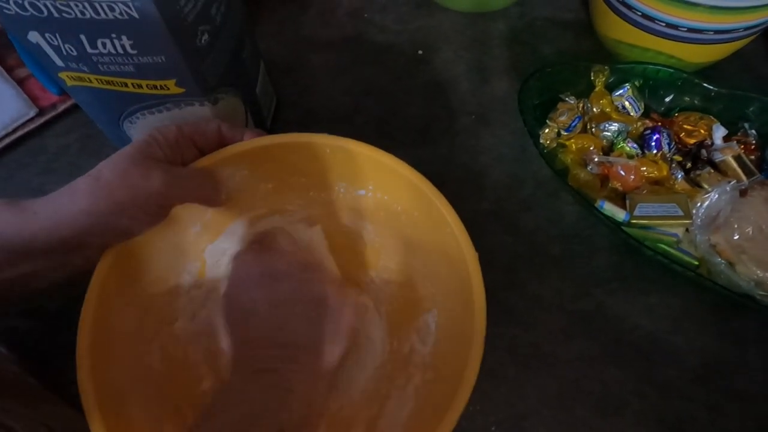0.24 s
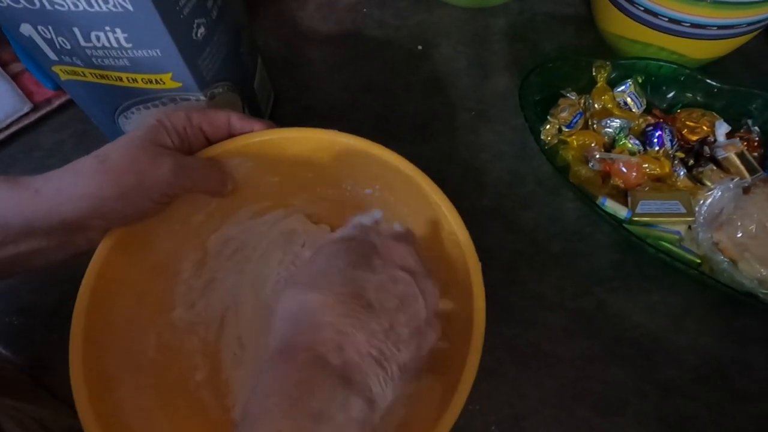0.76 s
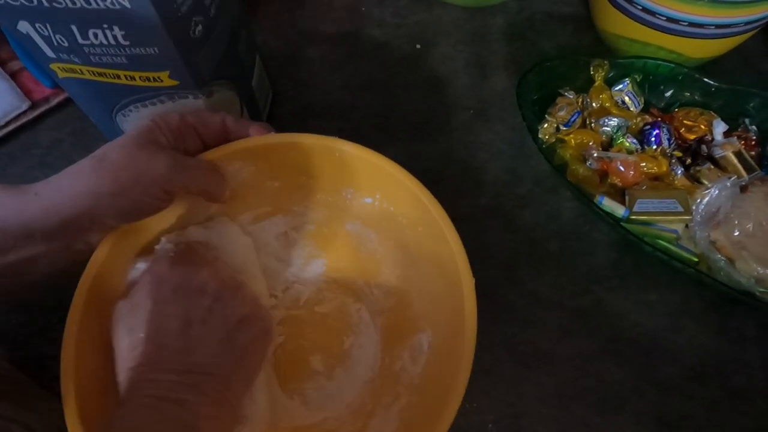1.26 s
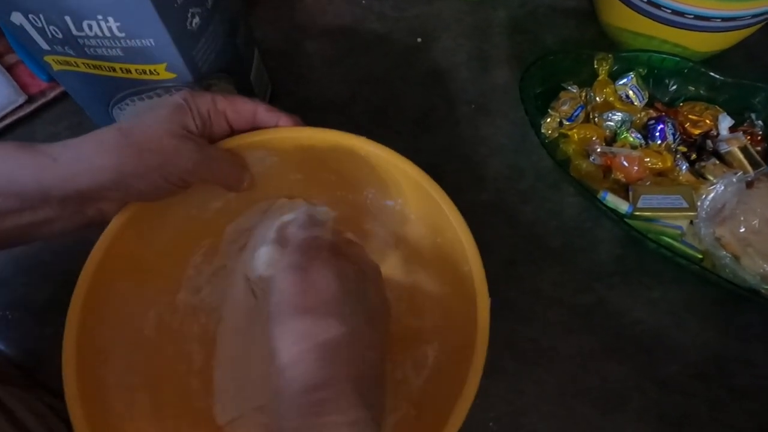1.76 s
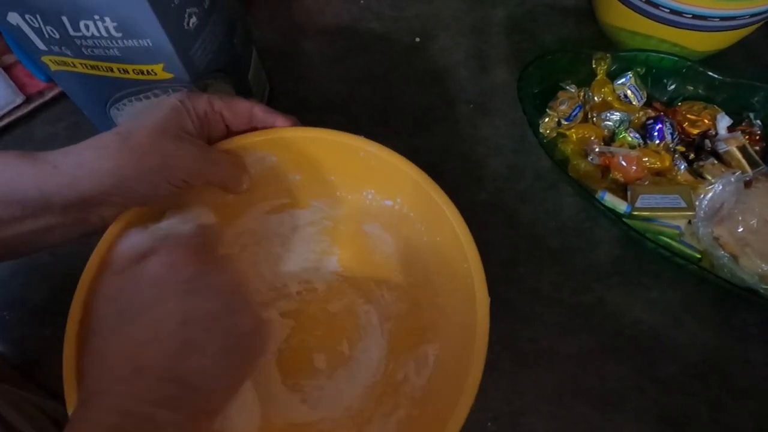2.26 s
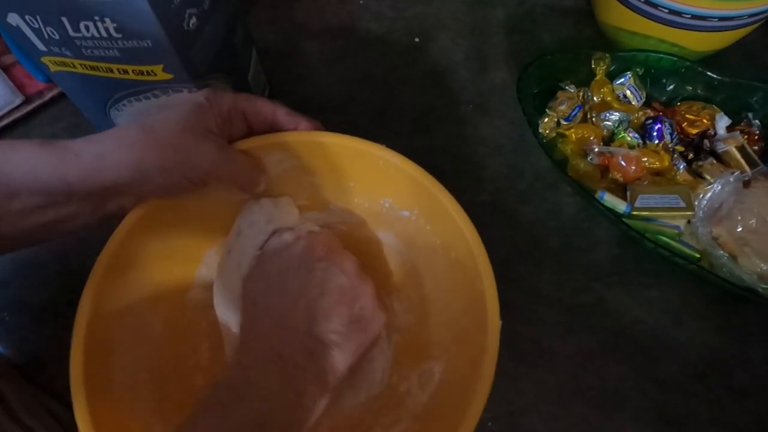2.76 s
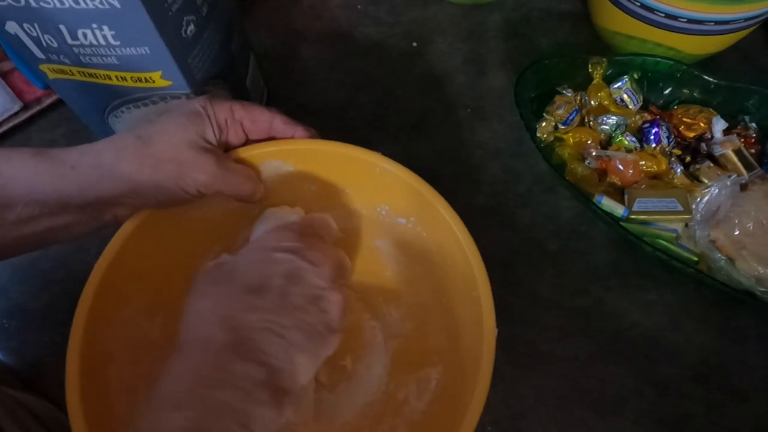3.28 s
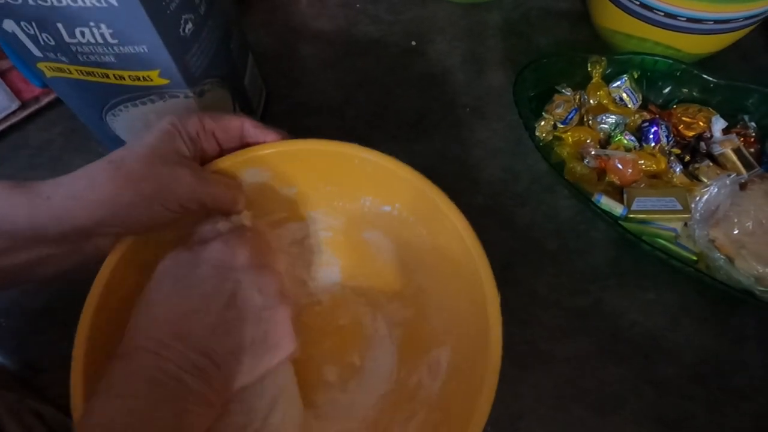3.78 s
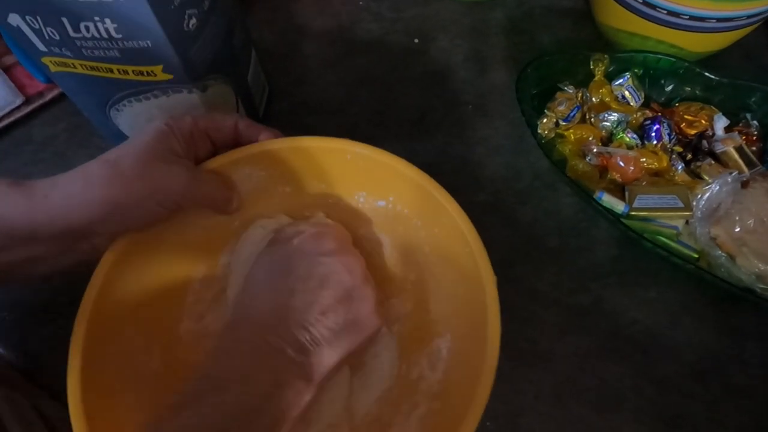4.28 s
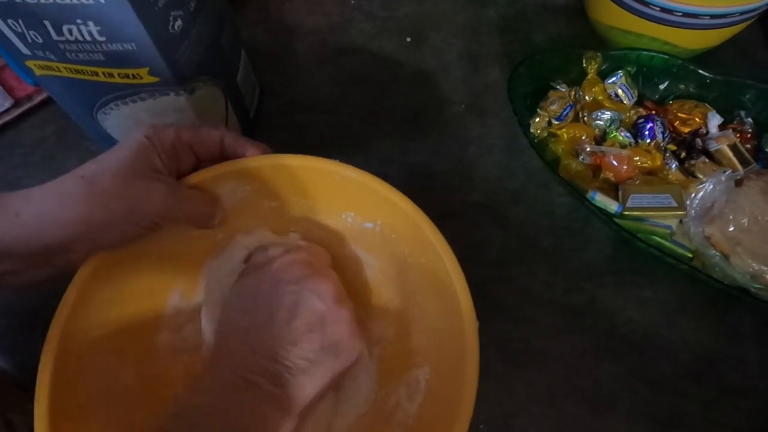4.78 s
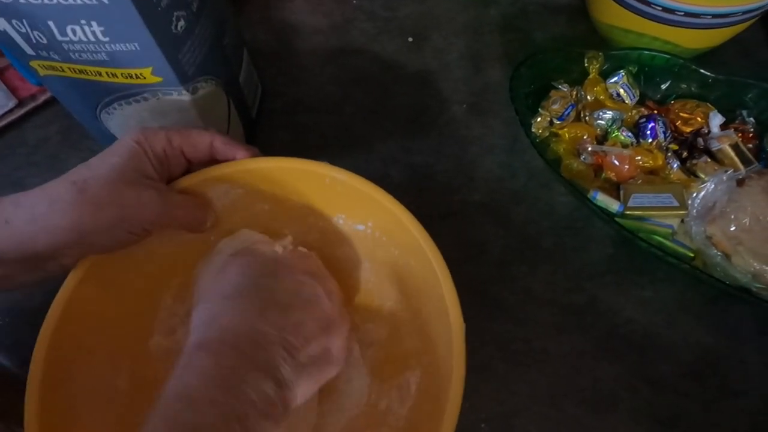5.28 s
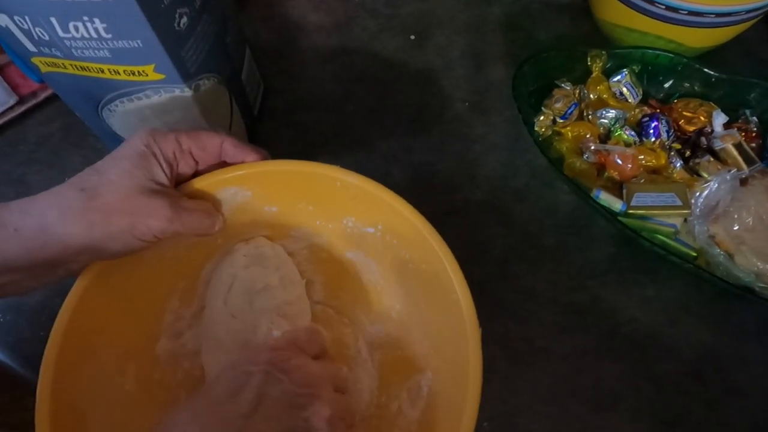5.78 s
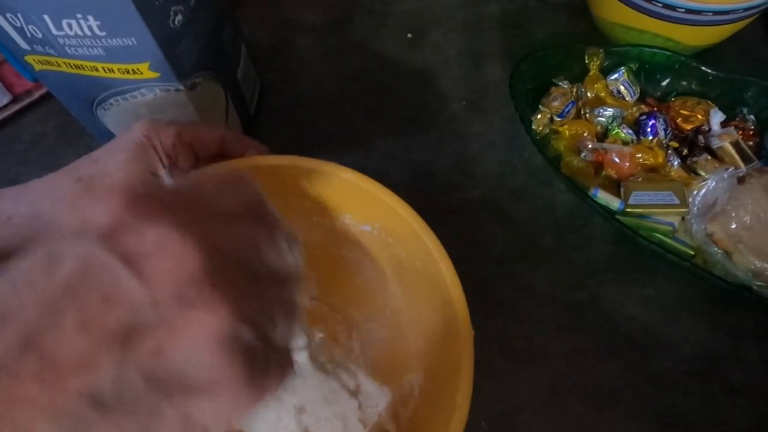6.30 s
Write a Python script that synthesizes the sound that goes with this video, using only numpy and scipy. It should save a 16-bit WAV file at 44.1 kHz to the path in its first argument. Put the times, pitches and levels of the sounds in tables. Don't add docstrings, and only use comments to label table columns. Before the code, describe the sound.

A quiet low kitchen hum runs throughout, heard close by a small microphone. At first there is only soft floury rubbing, with a faint knock at 0.1 s and a moderate one near 0.7. Around 1.3 to 1.7 s fingers scuff the plastic and the dough makes a longer gritty skid, leading to a strong hollow bowl knock at 1.8, its plastic ring followed instantly by a dull worktop thud. Scuffs and lighter knocks cluster at 2.1 to 2.3, then swishing rubs until a loud knock at 3.0. From 3.5 s pressing and folding bring shorter rubs, low dragging rumble, and firm knocks near 3.6, 4.0, 4.6, 5.0 and 5.5. A skid rasps at 4.3. The loudest clack lands at 5.8 amid gritty slips, another skid and a cluster of knocks come at 6.1 to 6.4, then soft rubbing fades.

```python
import sys
import numpy as np
from scipy import signal
from scipy.fft import rfft, irfft
from scipy.io import wavfile
from scipy.ndimage import uniform_filter1d

SR = 44100
rng = np.random.default_rng(int(sys.argv[2]) if len(sys.argv) > 2 else 0)


def volts(x):
    e = np.asarray(x, float) / 20
    return 10 ** e


def waveform_to_disk(signal):
    frames = np.transpose(np.atleast_2d(signal))
    scaled = np.clip(frames, -1, 1) * 32767
    samples = np.round(scaled).astype(np.int16)
    wavfile.write(sys.argv[1], SR, samples)


N = 288614

# start in seconds, peak in dB, then worktop thud and hard edge
# in dB relative to the peak, and board tilt in dB per octave.
FOOT_KNOCKS = [(0.104, -30.5, -10, -38, 1.5), (0.669, -13.5, -19, -33.5, 1.5), (1.25, -20, -18.5, -32, -8),
               (1.782, -8, -22, -29.5, 0.5), (1.839, -16.5, -16, -42, 6.5), (2.119, -19.5, -14.5, -36, 1),
               (2.288, -20, -13.5, -41, 5), (2.446, -38.5, 2, -22, -7.5), (3.037, -5.5, -19.5, -27, -6.5),
               (3.636, -9.5, -17.5, -36, -1.5), (3.724, -20.5, -15.5, -38, 1), (4.0, -14, -17.5, -41, 0),
               (4.262, -45, 5.5, -30, -3), (4.638, -10.5, -18.5, -29.5, -4.5), (5.023, -7.5, -18, -30.5, 1),
               (5.497, -7.5, -18, -28.5, 0), (5.823, -13.5, -16, -29, 10), (5.828, -3.5, -22, -26.5, 4),
               (6.185, -18, -9.5, -15, 12), (6.283, -16, -17, -19.5, 4), (6.287, -5.5, -16, -24, 6.5),
               (6.391, -22.5, -9, -35, -1.5)]
# pitch in Hz, level in dB, t60 in seconds.
WALL_MODES = [(492, -5, .065), (550, -5, .05), (620, -6, .03), (695, -2, .05), (765, -5, .035),
              (830, -2, .045), (1150, -6, .05), (1300, -9, .035), (1420, -9, .04), (960, -12, .03)]
RIM_MODES = [(1730, -3, .016), (2000, -4, .012), (2300, 0, .016), (2550, -2, .014), (2850, -4, .012),
             (3200, -6, .01), (3700, -9, .01), (4400, -11, .008), (5600, -17, .008)]
WORKTOP_MODES = [(105, -22, 0.45), (175.6, 2.5, 0.11), (272.8, -1.5, 0.078), (295.7, -3.5, 0.17),
                 (359, -3, 0.045), (404, -11, 0.12), (523.6, -1, 0.032)]


def unit(x):
    return x / np.sqrt(np.mean(x ** 2))


def band(x, hz, width_hz):
    return signal.lfilter(*signal.iirpeak(hz, hz / width_hz, fs=SR), x)


def twice(x, hz, width_hz, second_width_hz):
    return unit(band(band(x, hz, width_hz), hz, second_width_hz))


def fall(t, t60):
    return np.exp(-np.log(1000) * t / t60)


def highpass(x, order, hz):
    return signal.sosfilt(signal.butter(order, hz, "high", fs=SR, output="sos"), x)


def add(out, x, s):
    i = int(s * SR)
    out[i:i + len(x)] += x[:N - i]


def flicker(rate):
    hold = int(SR / rate)
    levels = rng.standard_normal(N // hold + 1)
    return uniform_filter1d(np.repeat(levels, hold), hold)[:N]


def friction(peaks, grain_db, wander_db, rate):
    slips = rng.standard_normal(N) * volts(grain_db * flicker(300))
    total = np.zeros(N)
    for hz, width_hz, db in peaks:
        width = 0.82 * width_hz
        total += volts(db + wander_db * flicker(rate)) * twice(slips, hz, width, width)
    return unit(total)


def widths(modes, damping):
    return [(hz, damping * 2.2 / t60, db) for hz, db, t60 in modes]


def strokes(middle_s, swell_s, fade_s, db):
    points = np.arange(0, N + 64, 64)
    t = points[:, None] / SR - middle_s
    reach = np.maximum(np.where(t < 0, swell_s, fade_s), .01)
    power = volts(db - 10.9 * (t / reach) ** 2) ** 2
    return np.interp(np.arange(N), points, np.sqrt(power.sum(axis=1)))


def room():
    # frequency in Hz, level in dB per Hz.
    spectrum = [(65, -56), (110, -5.5), (187, -13), (267, -7), (445, -17), (511, -10.5), (1240, -22),
                (3510, -28), (12100, -49), (15800, -97), (22000, -120)]
    hz, db = np.transpose(spectrum)
    f = np.fft.rfftfreq(N, 1 / SR) + 1
    colour = volts(np.interp(np.log(f), np.log(hz), db))
    return volts(-53) * unit(irfft(rfft(rng.standard_normal(N)) * colour, N))


def sliding():
    # middle in seconds, half length in seconds, board in dB, bowl floor in dB.
    drags = [(0.025, 0.16, -57, -58), (0.27, 0.12, -44, -55.5), (0.384, 0.061, -47, -49),
             (.59, 0.079, -47.5, -46.5), (0.758, 0.07, -48, -51), (0.982, 0.063, -48.5, -56.5),
             (1.167, 0.064, -55, -55), (1.325, .07, -46, -59), (1.549, 0.12, -40, -44.5),
             (1.724, .05, -56, -44.5), (1.98, 0.045, -60.5, -53), (2.35, 0.13, -64, -51),
             (2.657, 0.087, -45, -47.5), (2.756, 0.075, -40, -47), (3.15, 0.12, -56, -54),
             (3.365, 0.052, -54, -52), (3.525, 0.064, -55.5, -62), (3.853, 0.15, -49, -47),
             (4.174, 0.14, -45.5, -52.5), (4.314, 0.084, -45.5, -43.5), (4.563, 0.074, -55, -65),
             (4.767, 0.072, -41.5, -44.5), (5.126, 0.17, -47, -46), (5.45, 0.13, -51, -48.5),
             (5.612, 0.051, -45.5, -46.5), (5.876, 0.09, -47, -35.5), (6.03, 0.055, -50.5, -38),
             (6.173, 0.049, -51.5, -41.5), (6.357, 0.083, -54, -47), (6.493, 0.051, -56, -42.5)]
    s, half, board_db, base_db = np.transpose(drags)
    board = friction(widths(WORKTOP_MODES[1:2], damping=1.8), grain_db=3.0, wander_db=2.5, rate=15)
    base = friction(widths(WORKTOP_MODES[2:6], damping=1.5), grain_db=3.0, wander_db=2.0, rate=15)
    rumble_modes = [(35, 41, -3.5), (63, 59, 3.5), (95.3, 34, 3.0)]  # Hz, width Hz, dB
    rumble = friction(rumble_modes, grain_db=0.0, wander_db=-4.5, rate=17)
    rumble_gain = strokes(s, half, half, -60.5 + 1.53 * (board_db + 48)) + volts(-72.5)
    return strokes(s, half, half, board_db) * board + strokes(s, half, half, base_db) * base + rumble_gain * rumble


def kneading():
    # fastest moment,
    # swell and fade in seconds, rub in dB, weight on the wall in dB relative to the rub.
    stirs = [(.15, 0.06, 0.1, -50.5, -17.5), (0.331, 0.14, 0.13, -46.5, 0), (.6, 0.083, 0.15, -49, 1),
             (.74, 0.058, 0.039, -47.5, 4.5), (.98, 0.029, 0.11, -52, -9), (1.15, .1, 0.092, -48.5, -1),
             (1.4, 0.16, 0.11, -53, -11), (1.52, 0.16, 0.096, -46, -4), (1.66, 0.07, 0.044, -37.5, -4),
             (1.8, 0.1, 0.052, -42.5, -5), (1.9, 0.11, 0.047, -51.5, -4), (2.17, .03, 0.019, -41, -11),
             (2.27, 0.11, 0.05, -45.5, -12), (2.42, 0.14, 0.23, -48.5, -14), (2.68, 0.14, 0.14, -46.5, -3),
             (2.84, 0.12, 0.046, -42, 0.5), (2.97, 0.073, 0.088, -47, -6), (3.07, 0.048, 0.064, -62, 14),
             (3.17, 0.055, 0.038, -63, 22.5)]
    folds = [(3.48, 0.057, 0.1, -50.5, -7.5), (3.67, 0.048, 0.037, -44.5, -15),
             (3.76, 0.021, 0.057, -50.5, 9), (3.86, 0.098, 0.037, -43.5, 3), (3.97, 0.075, 0.076, -48, 0.5),
             (4.13, 0.044, 0.22, -49, -3), (4.32, 0.047, 0.039, -40, -2.5),
             (4.42, 0.056, 0.049, -43.5, -3.5), (4.561, 0.045, 0.066, -48.5, -15),
             (4.64, 0.032, 0.034, -38.5, -8), (4.76, .07, .05, -52.5, -2.5), (4.928, 0.027, 0.061, -44, -5),
             (5.11, 0.1, 0.17, -48.5, -0.5), (5.37, 0.032, 0.078, -47, -3), (5.439, .04, 0.047, -51, -6),
             (5.53, 0.081, 0.07, -50, -11), (5.86, 0.05, 0.094, -45.5, -1), (6.02, 0.044, 0.15, -45.5, -2),
             (6.181, 0.048, 0.034, -38, -1.5), (6.32, 0.095, 0.098, -53.5, 10),
             (6.45, 0.045, 0.15, -59, -4)]
    # pitch in Hz, width in Hz, level in dB.
    air_peaks = [(1900, 2280, 2.5), (2291, 920, -3), (2615, 1200, 2), (3090, 1800, -4), (3740, 810, -20)]
    flour_peaks = [(4230, 3150, 12.5), (5630, 2800, 1), (10240, 1400, 1.5), (12200, 3300, -6)]
    s, swell, fade, db, weight_db = np.transpose(stirs + folds)

    flour_db = np.repeat([-53.5, -55.5], [len(stirs), len(folds)]) + 0.42 * (db + 47)
    load = strokes(s, swell, fade, db + weight_db)
    speed = strokes(s, swell, fade, db) + volts(-81.5)

    shake, shake_t60_s = np.zeros(N), 0.25
    for knock_s, knock_db, *_ in FOOT_KNOCKS:
        add(shake, volts(knock_db - 30.5 - 60 * np.arange(SR // 2) / SR / shake_t60_s), knock_s)

    rub = friction(air_peaks, grain_db=2.5, wander_db=3.2, rate=14)
    rub = rub + volts(-3) * friction(widths(RIM_MODES[:7], damping=.8), grain_db=2.5, wander_db=5, rate=9)
    flour = friction(flour_peaks, grain_db=0.5, wander_db=4.5, rate=27)
    wall = friction(widths(WALL_MODES[:6], damping=2.2), grain_db=3.5, wander_db=1.5, rate=30)
    upper_wall = friction(widths(WALL_MODES[6:9], damping=3.0), grain_db=3.5, wander_db=1.5, rate=30)

    hiss = speed * rub + strokes(s, swell, fade, flour_db) * flour
    return hiss + (load + shake) * wall + volts(-6) * np.sqrt(load * speed) * upper_wall


def ring(modes, chance, push_ms, spread_db, detune, flip=1):
    hz, db, t60 = np.transpose(modes)[:, :, None]
    weight, bend = chance[:len(modes), None], chance[-len(modes):, None]
    t = np.arange(SR // 4) / SR
    sign = flip ** np.arange(len(modes))[:, None]
    level = sign * volts(db + spread_db * weight)
    waves = level * fall(t, t60) * np.sin(2 * np.pi * hz * (1 + detune * bend) * t)
    x = np.convolve(waves.sum(axis=0), np.hanning(int(push_ms * SR / 1000) + 3))
    return x / np.abs(x).max()


def knocks():
    out, t = np.zeros(N), np.arange(SR // 10) / SR
    for s, db, thud_db, edge_db, tilt_db in FOOT_KNOCKS:
        chance = rng.standard_normal((3, 20))
        wall = ring(WALL_MODES, chance[0], push_ms=.35, spread_db=2.5, detune=.018)
        add(out, volts(db + 2) * wall, s + .003)
        rim = ring(RIM_MODES, chance[1], push_ms=.08, spread_db=3.0, detune=0.053, flip=-0.87)
        add(out, volts(db + edge_db + 18.5) * rim, s + .003)
        crack = twice(rng.standard_normal(len(t)), 2400, 3000, 5000) * fall(t, .045)
        add(out, volts(db + edge_db - 1) * crack, s + .003)
        board = [(hz, level_db + tilt_db * np.log2(hz / 240), t60) for hz, level_db, t60 in WORKTOP_MODES]
        thud = ring(board, chance[2], push_ms=0.73, spread_db=4.5, detune=0.018, flip=-1.027)
        thud = volts(db + thud_db + 12.0) * thud
        add(out, volts(-10.5) * thud, s + 0.00436)
        damp = np.clip(3.5 - np.arange(len(thud)) / SR / 0.00754, .14, 1)
        add(out, thud * damp, s + 0.0167)
    return highpass(out, 2, 125)


def skids():
    # start and length in seconds, level in dB, pitch in Hz, low part in dB relative to the tone.
    slips = [
        (.952, .028, -35, 2400, -14),
        (1.61, .095, -37, 2550, -2),
        (3.333, .02, -47, 2500, -15),
        (3.93, .07, -41, 2700, -15),
        (4.29, .063, -35, 2600, -6),
        (5.784, .03, -40, 2600, -4),
        (5.89, .03, -37, 2500, -8),
        (6.142, .056, -34, 2500, -10),
    ]
    out, t = np.zeros(N), np.arange(SR // 5) / SR
    for s, length, db, hz, low_db in slips:
        grit = rng.standard_normal(len(t))
        shape = np.clip(t / .006, 0, 1) * np.exp(-np.maximum(t - length, 0) / 0.0055)
        low = unit(band(band(grit, 770, 420), 610, 430))
        tone = twice(grit, hz, 830, 2700) + volts(low_db) * low
        add(out, volts(db) * tone * shape, s)
    return out


def scuffs():
    # start in seconds, peak in dB, pitch in Hz, low part in dB relative to the tone, decay in seconds.
    touches = [(0.9566, -24, 1430, -20, 0.12), (1.2752, -25.5, 2360, -7, 0.062),
               (1.4083, -25, 2000, -7, 0.028), (1.4583, -14.5, 1510, -5, 0.032),
               (1.5058, -28, 1420, 5.5, 0.048), (1.566, -27, 1380, -4, 0.087),
               (2.132, -15.5, 1370, -6, 0.056), (2.133, -14.5, 2300, -20, 0.048),
               (2.168, -25, 2400, -10, 0.027), (2.9442, -34, 2720, -2.5, 0.21),
               (3.1683, -28.5, 2560, 10, 0.032), (3.344, -22.5, 2520, -10, 0.047),
               (3.6185, -38, 1900, -8, 0.098), (4.2904, -19, 2260, -31, 0.053),
               (4.9135, -24.5, 970, -8, 0.091), (5.3807, -28, 2700, -1, 0.037),
               (5.7801, -18, 2560, -5.5, 0.046), (5.8967, -37, 2270, -21, 0.093),
               (6.143, -36, 2300, -28, 0.093), (6.1756, -19.5, 2480, -30, 0.055),
               (6.184, -26, 2390, -5, 0.033), (6.4394, -33, 2210, 1, 0.11)]
    out, t = np.zeros(N), np.arange(SR // 5) / SR
    for s, db, hz, low_db, decay in touches:
        grit = rng.standard_normal(len(t))
        rise = max(0.037 * decay, .0005)
        shape = np.clip(t / rise, 0, 1) * fall(np.maximum(t - rise, 0), max(decay, .01))
        tone = twice(grit, hz, .25 * hz, .6 * hz)
        tone = tone + volts(-13) * twice(grit, 3200, 3000, 5000)
        tone = tone + volts(low_db) * twice(grit, 640, 360, 360)
        add(out, volts(db - 12.0) * tone * shape, s + 0.00105)
    return out


def kitchen_tail(blows):
    t = np.arange(SR // 3) / SR
    tail = band(band(rng.standard_normal(len(t)), 450, 1170), 630, 3000)
    tail = tail * fall(t, 0.48) * np.clip(t / 0.019, 0, 1)
    return volts(-22) * signal.fftconvolve(blows, tail / np.sqrt(np.sum(tail ** 2)))[:N]


def scene():
    blows = knocks() + skids() + scuffs()
    return np.tile(blows + kitchen_tail(blows) + kneading() + sliding() + room(), (2, 1))


def roll_off(x):
    return signal.sosfilt(signal.butter(12, 15400, fs=SR, output="sos"), x)


def record(dry):
    notch_hz, notch_width_hz = 8910, 2060
    x = signal.lfilter(*signal.iirnotch(notch_hz, notch_hz / notch_width_hz, fs=SR), dry)
    x = highpass(x, 2, 50)
    x = signal.sosfilt(signal.butter(5, 11400, fs=SR, output="sos"), x)
    x = np.tanh(x / .8) * .8
    side = volts(-5.5) * np.roll(highpass(x[0], 8, 11900), 353)
    return roll_off(x + side * np.array([[1], [-1]]))


dry = scene()
out = record(dry)
waveform_to_disk(out)
```